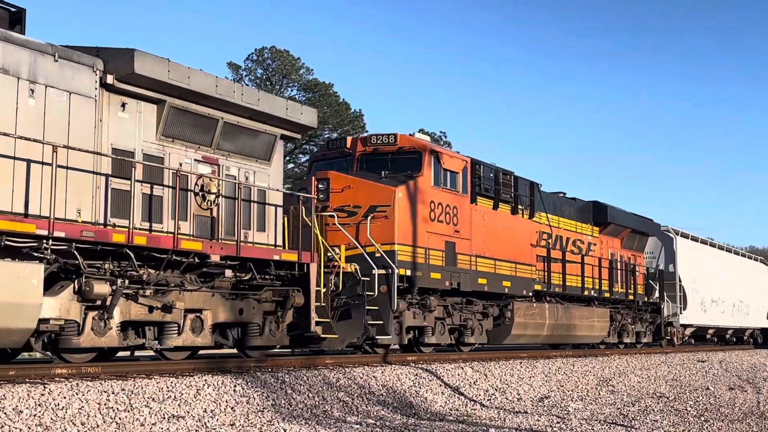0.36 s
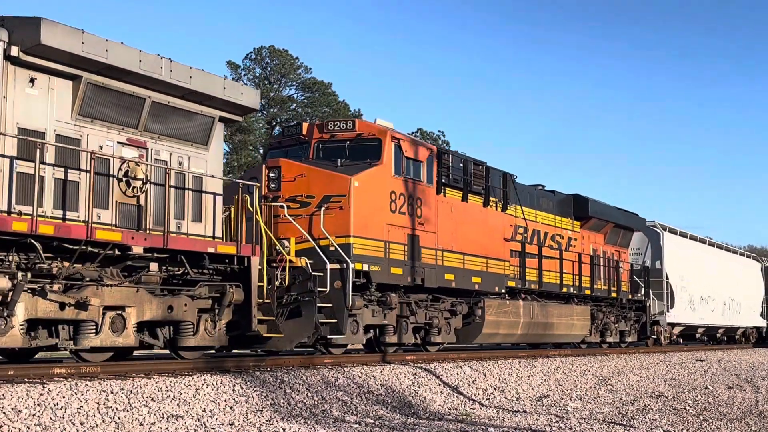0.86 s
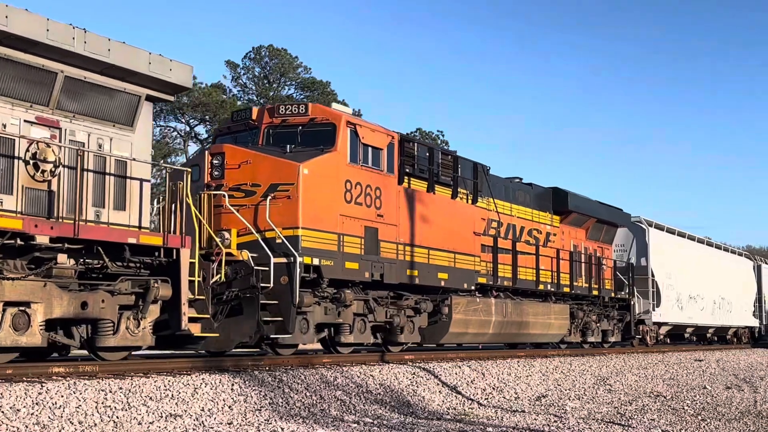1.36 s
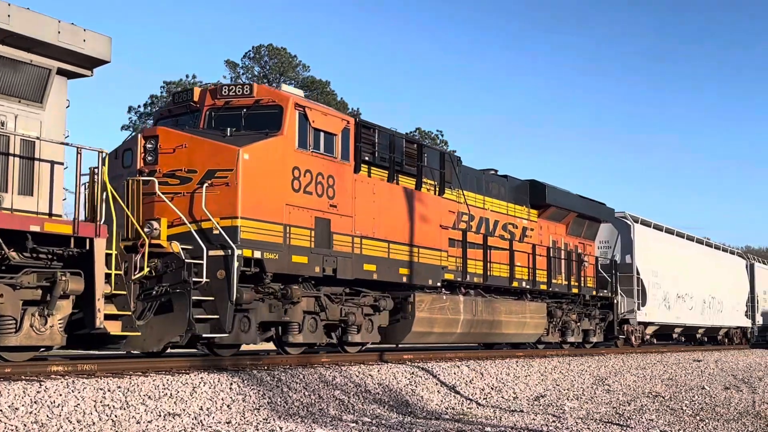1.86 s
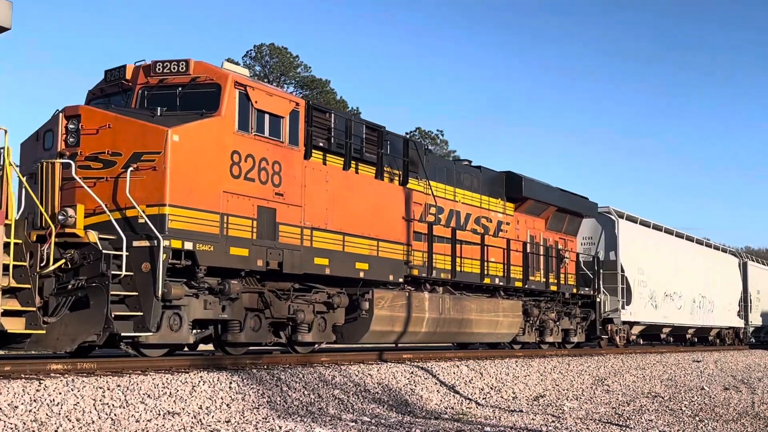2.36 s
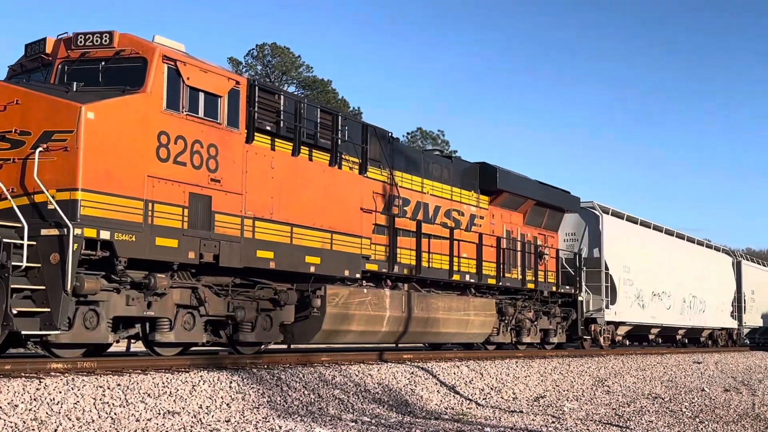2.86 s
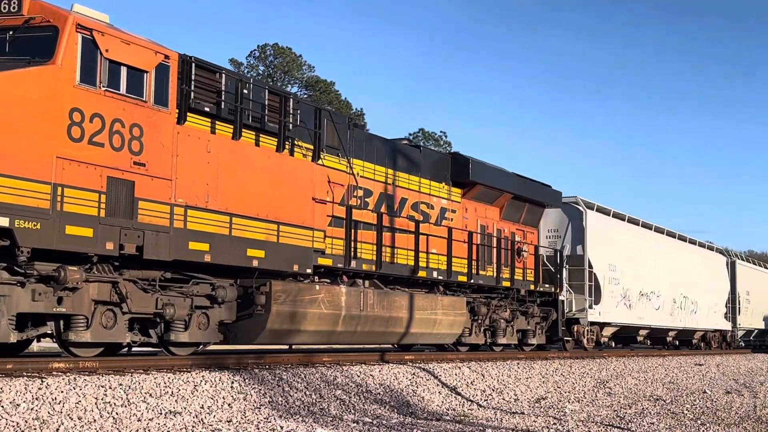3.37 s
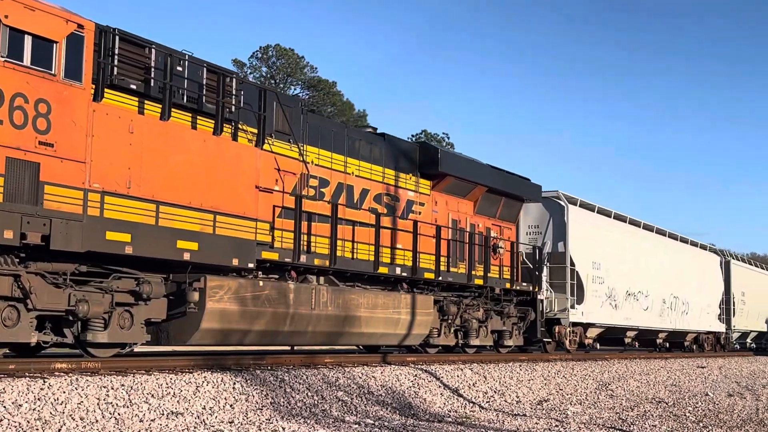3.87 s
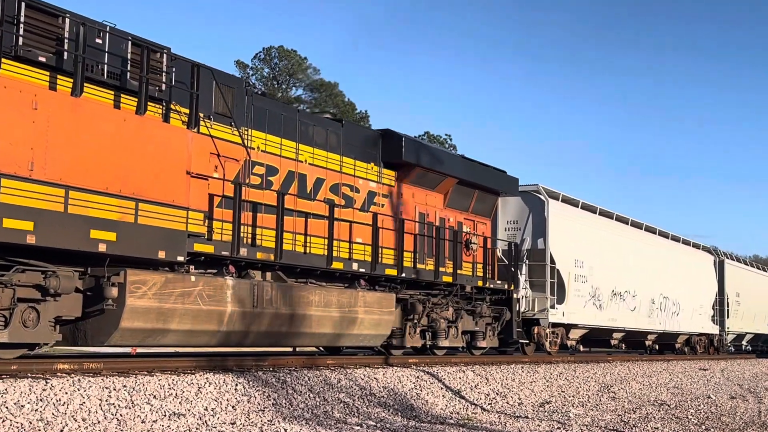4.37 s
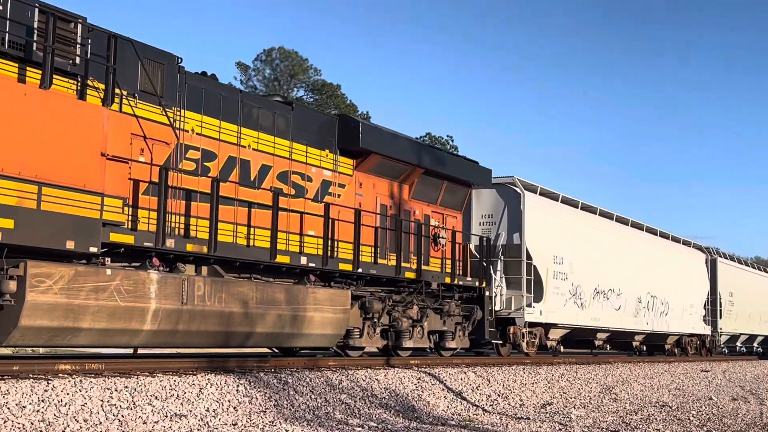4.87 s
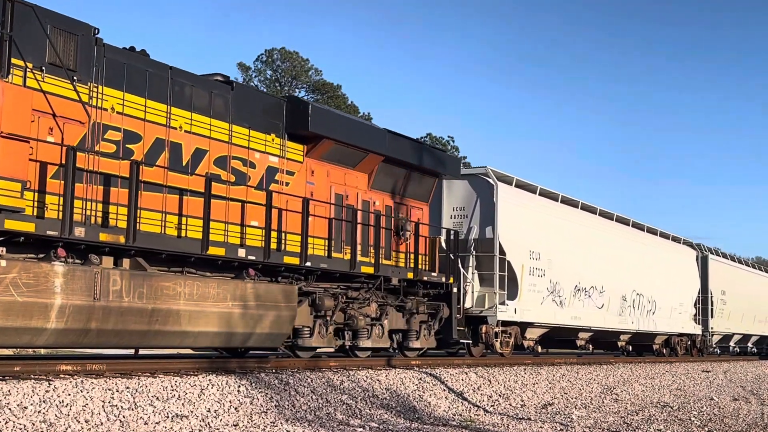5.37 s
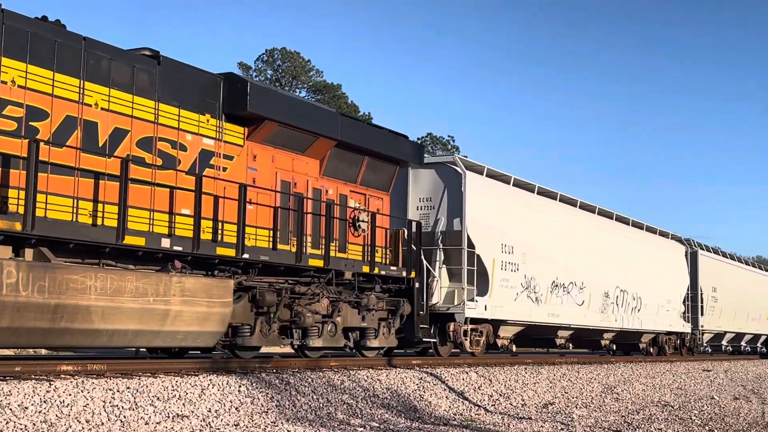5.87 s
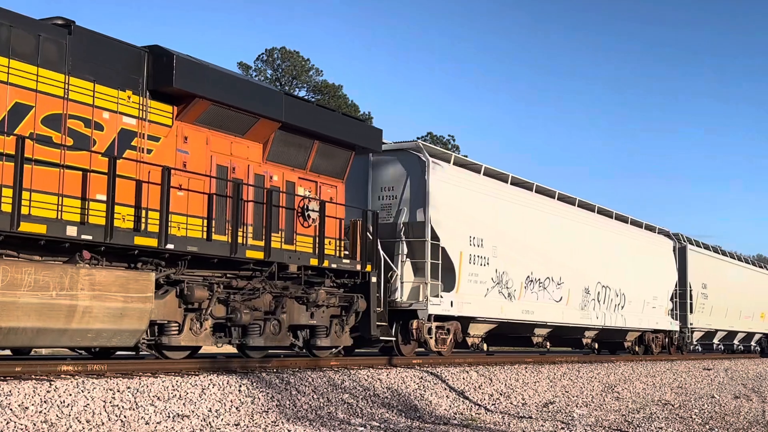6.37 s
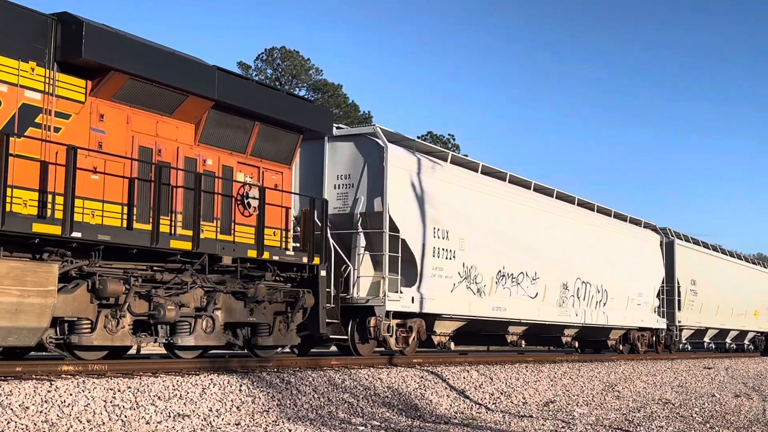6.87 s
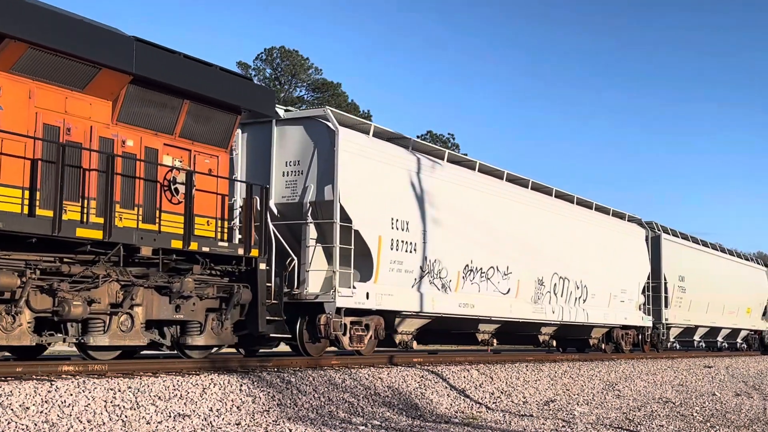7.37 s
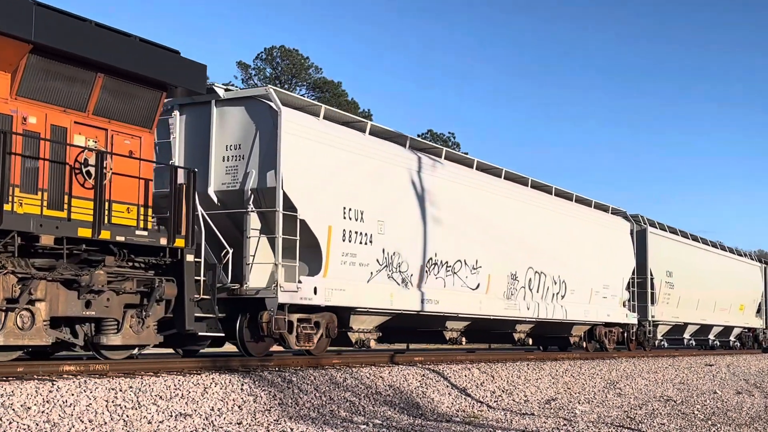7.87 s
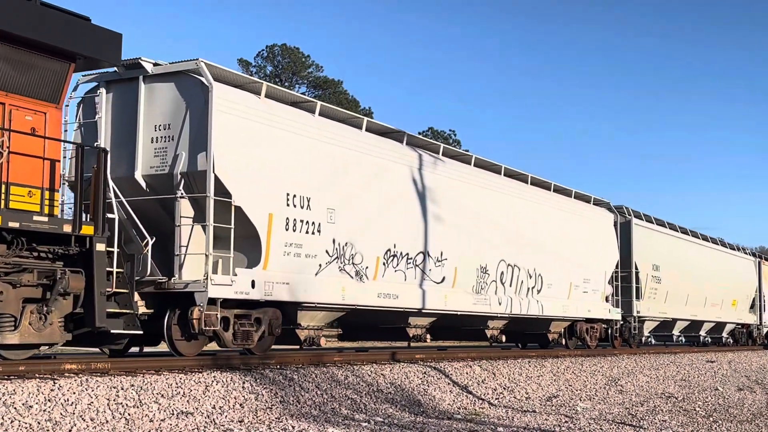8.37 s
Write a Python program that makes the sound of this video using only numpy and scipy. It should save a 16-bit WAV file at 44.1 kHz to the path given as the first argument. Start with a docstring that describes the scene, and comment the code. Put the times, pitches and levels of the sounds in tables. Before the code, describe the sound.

Deep throbbing engine hum and rumble roll by outdoors, roar growing, with metallic ticking, low wind thumps, a faint repeating bell and late wheel ringing.

```python
"""Two diesel locomotives haul a freight slowly past: their exhausts, summed orders of each engine cycle,
beat against each other. Shaped noise makes the body rumble, the roar and the wind that buffets two microphone
ports for a few seconds; resonances ring as valve gear ticks, hood panels and wheels. Sines make the
alternator whine, a fan hum, small squeaks and a bell far off."""
import sys
import numpy as np
from scipy import signal
from scipy.fft import rfft, irfft, next_fast_len
from scipy.io import wavfile
from scipy.ndimage import uniform_filter1d

SR = 44100
rng = np.random.default_rng(int(sys.argv[2]) if len(sys.argv) > 2 else 0)


def generate_wav(sig):
    """Save sig (samples, or channels by samples) to the path in sys.argv[1] as 16-bit PCM at SR."""
    pcm = np.round(np.clip(np.atleast_2d(sig).T, -1, 1) * 32767).astype(np.int16)
    wavfile.write(sys.argv[1], SR, pcm)


def invert_db(level):
    """Linear amplitude ratio for a level in decibels (20 dB per decade), elementwise."""
    return 10 ** (np.asarray(level, dtype=float) / 20)


N = 385434
T = np.arange(N) / SR  # time (s)

# roar rising as the trailing engine draws near, before each layer's trim: time_s, level_db
ROAR_CURVE = [(0, -49.5), (1, -51), (1.4, -48.5), (2.6, -48), (3.2, -48), (3.7, -46.5), (4.1, -48),
              (4.8, -47.5), (5.1, -46), (5.9, -45.5), (6.7, -43.5), (7.05, -42.5), (7.55, -42), (7.85, -40),
              (8.22, -41.5), (8.74, -42.5)]
# likeness of the two channels of rumble and roar: frequency_hz, likeness (0-1)
CHANNEL_LIKENESS = [(60, 1), (140, 0.92), (300, 0.93), (700, 0.53), (1200, 0.095), (2000, 0.74),
                    (3000, 0.94), (4500, 1), (6000, 0.82), (8500, 0.99), (12000, 0.37)]
# mean strength of the breeze: time_s, level_db
BREEZE_CURVE = [(.72, -47.5), (.9, -33), (1.1, -30), (1.6, -32.5), (2.3, -30.5), (2.7, -38.5), (3.1, -31.5),
                (3.55, -28.5), (3.9, -32.5), (4.5, -31.5), (5, -40), (5.52, -44)]


def evened(x):
    """Scales to rms 1."""
    return x / np.sqrt(np.mean(x ** 2) + 1e-20)


def read(points, hz):
    """Reads a spectrum table on a log-frequency axis."""
    f, value = np.transpose(points)
    return np.interp(np.log(hz + 1), np.log(f + 1), value)


def columns(rows, t=T):
    """Every value column of a curve table at the times t."""
    s, *values = np.transpose(rows)
    return [np.interp(t, s, v) for v in values]


def wander(rate_hz):
    """Slow random curve of rms 1, with straight lines between its points."""
    points_s = np.arange(0, T[-1] + 1, 1 / rate_hz)
    return evened(np.interp(T, points_s, rng.standard_normal(len(points_s))))


def bump(t, at_s, spread_s):
    """A bell-shaped swell of height 1."""
    return np.exp(-((t - at_s) / spread_s) ** 2)


def noise(shape_db, same, patchy_db, size):
    """Two partly alike channels of random short-time spectra; shape_db(hz, t) with drifting patches."""
    hop = size // 4
    frames, hz = N // hop + 5, np.fft.rfftfreq(size, 1 / SR)
    a, b, c, d, patches = rng.standard_normal((frames, len(hz), 5)).T
    # smoothed over frequency, then over time
    patches = uniform_filter1d(patches, size=size // 64, axis=0)
    patches = evened(uniform_filter1d(patches, size=8, axis=1))
    same = np.clip(same(hz), 0, 1)[:, None]
    first, other = a + 1j * b, c + 1j * d
    spectra = np.array([first, same * first + np.sqrt(1 - same ** 2) * other])
    spectra *= invert_db(shape_db(hz, np.arange(frames) * hop / SR) + patchy_db * patches)
    return evened(signal.istft(spectra, nperseg=size, noverlap=size - hop)[1][:, :N])


def ringing(modes, flicker_db, flicker_hz):
    """Noise kept alive in narrow modes, each flickering by itself."""
    out = np.zeros(N)
    for hz, width_hz, level_db in modes:
        edges_hz = [hz - width_hz / 2, hz + width_hz / 2]
        band = signal.butter(2, edges_hz, "bandpass", fs=SR, output="sos")
        mode = evened(signal.sosfilt(band, rng.standard_normal(N)))
        out += invert_db(level_db + flicker_db * wander(flicker_hz)) * mode
    return evened(out)


def turns():
    """Engine cycles turned by the leading and the trailing engine: the running sum of their speeds."""
    # engine speeds: time_s, leading_cycles_per_s, trailing_cycles_per_s
    speeds = [(0, 7.3532, 7.4587), (3, 7.3358, 7.4677), (6, 7.3344, 7.4492), (8.74, 7.3111, 7.4255)]
    # where in its cycle each engine starts: leading_turns, trailing_turns
    start_turns = (-.016, .2753)
    return [start + np.cumsum(speed) / SR for start, speed in zip(start_turns, columns(speeds))]


def exhausts():
    """Each stack hums the orders of its cycle; the trailing stack's outer ones emerge from behind the cab."""
    # exhaust loudness: time_s, leading_db, trailing_db
    loudness = [(0, -24.5, -33), (.6, -21, -26), (1.2, -24.5, -19.5), (1.8, -21.5, -22.5),
                (2.4, -19.5, -22), (3, -22.5, -18.5), (3.6, -21, -17.5), (4.2, -26.5, -16),
                (4.8, -21, -15.5), (5.4, -25, -14), (6, -30, -15), (6.6, -24, -13.5), (7.2, -22.5, -14),
                (7.8, -47, -12.5), (8.3, -29, -13.5), (8.74, -39, -14)]
    # twelve cylinders in uneven banks, relative levels: order (multiple of the cycle), leading_db, trailing_db
    orders = [(6, -30, -20), (7, -28, -26), (9, -13, -13), (10, -13, -17), (11, -8, -13), (12, 0, 0),
              (13, -15, -16), (14, -16, -21), (15, -4, -9), (16, -22, -25), (20, -28, -26), (21, -23, -25),
              (22, -24, -26), (24, -30, -27), (26, -30, -22), (27, -30, -20), (28, -28, -17),
              (29, -30, -21), (30, -32, -26), (31, -32, -27), (32, -32, -24), (34, -34, -29),
              (36, -34, -36)]
    hidden_db, clear_db, emerge_s, emerge_spread_s = -9, 1.0, 4.5, 1.2
    lead, trail = turns()
    lead_db, trail_db = columns(loudness)
    emerged = (1 + np.tanh((T - emerge_s) / emerge_spread_s)) / 2
    outer_db = hidden_db + (clear_db - hidden_db) * emerged
    out = np.zeros(N)
    for k, a_db, b_db in orders:
        # the manifold spreads the orders over the cycle, so only every third lines up
        lag_turns = (k - 12) * (k - 15) / 9
        is_outer = k > 17 or k < 10
        lead_level = invert_db(lead_db + a_db + .8 * wander(3))
        trail_level = invert_db(trail_db + b_db + is_outer * outer_db + .8 * wander(3))
        out -= lead_level * np.sin(2 * np.pi * (k * lead - lag_turns))
        out -= trail_level * np.sin(2 * np.pi * (k * trail - lag_turns))
    return np.sqrt(2) * out


def rumble():
    """Body rumble: low noise that takes a share of the roar's rise."""
    # relative spectrum: frequency_hz, level_db
    rumble_shape = [(25, -41), (40, -19), (65, 3), (90, -1.5), (115, 1.5), (140, -6), (200, -7.5),
                    (300, -12), (450, -19.5), (900, -47.5), (3000, -91.5)]
    level_db, share, roar_mid_db = -25, .4, -47
    rumble_db = level_db + share * (columns(ROAR_CURVE)[0] - roar_mid_db)
    body = noise(lambda hz, t: read(rumble_shape, hz)[:, None],
                 lambda hz: read(CHANNEL_LIKENESS, hz), patchy_db=0.5, size=2048)
    return invert_db(rumble_db) * body


def roar():
    """Fan and wheel noise, coloured by how far the radiator intake faces us, puffing thrice a trailing cycle."""
    # relative spectrum away from the intake: frequency_hz, level_db
    far_shape = [(150, -12.5), (260, 6), (360, 8), (470, 4.5), (700, 0.5), (1000, -3), (1250, -3),
                 (1500, -7), (2200, -9), (3100, -7), (5000, -11.5), (6500, -15.5), (7800, -20),
                 (9500, -23.5), (11500, -28), (14300, -44)]
    # relative spectrum close to the intake: frequency_hz, level_db
    near_shape = [(150, -16.5), (260, 6), (360, 13.5), (470, 10), (600, 7), (780, 1), (1050, 8.5),
                  (1270, 0), (1500, 4.5), (2200, -3.5), (3100, -8.5), (5000, -7.5), (6500, -9.5),
                  (7800, -15.5), (9500, -21), (11500, -25), (14300, -35)]
    base_share, added_share, facing_s, facing_spread_s = .27, .47, 5.6, 2.1

    def blend(hz, t):
        """Moves from the far spectrum towards the near one, in dB."""
        facing = base_share + added_share * bump(t, facing_s, facing_spread_s)
        far_db, near_db = read(far_shape, hz)[:, None], read(near_shape, hz)[:, None]
        return far_db + (near_db - far_db) * facing

    hiss = noise(blend, lambda hz: read(CHANNEL_LIKENESS, hz), patchy_db=1.68, size=512)
    puffs = 1 + 0.086 * np.cos(2 * np.pi * (3 * turns()[1] - .25))
    return invert_db(columns(ROAR_CURVE)[0] + 8.5) * puffs * hiss


def valve_gear():
    """Short scrapes at fixed places of the leading cycle ring the casing, unevenly from blow to blow."""
    # knocks in one cycle, relative levels: place_turns (0-1), level_db
    knocks = [(.06, -3), (.26, -4.5), (.39, 0.5), (.75, -11.5)]
    # casing modes, relative levels: pitch_hz, level_db, t60_s
    casing = [(1110, -2.5, 0.025), (2090, 1, 0.0097), (2820, -2, 0.004), (3370, -0.5, 0.0043),
              (4050, 0.5, 0.0034), (5040, -3.5, 0.0088), (5780, -5, 0.0051), (7350, -6, 0.0043),
              (10700, -13, 0.0023), (12400, -25, .003)]
    turn, t, out = turns()[0], np.arange(2000) / SR, np.zeros(N)
    cycle = np.floor(turn).astype(int) + 1
    for hz, level_db, t60_s in casing:
        drive = np.zeros(N)
        for place, knock_db in knocks:
            strength_db = knock_db + 4.77 * rng.standard_normal(cycle[-1] + 1)
            window = np.exp(-.5 * ((turn % 1 - place) / 0.035) ** 2)
            drive += invert_db(strength_db[cycle]) * window
        scrape = drive * rng.standard_normal(N)
        ring = invert_db(-60 * t / t60_s) * np.sin(2 * np.pi * hz * t)
        out += invert_db(level_db - 6.0) * signal.oaconvolve(scrape, ring / np.linalg.norm(ring))[:N]
    return invert_db(columns(ROAR_CURVE)[0]) * out


def housing():
    """Hood panels pick their own notes out of the roar: narrow noise bands that follow its level."""
    # panel modes, relative levels: pitch_hz, width_hz, level_db
    panels = [(1064, 50, -1), (2055, 92, 0.5), (2502, 39, -8), (2813, 200, -3), (3197, 130, -4.5),
              (3586, 110, -6.5), (4100, 70, -11.5), (4866, 97, -8.5)]
    return invert_db(columns(ROAR_CURVE)[0] - 6.5) * ringing(panels, flicker_db=4.0, flicker_hz=7)


def whine():
    """Alternator slot tone and its multiples, each wavering in level."""
    # loudness: time_s, third_multiple_db, other_multiples_db
    whine_levels = [(0, -58, -62.5), (1.7, -51.5, -63), (2.2, -65, -64.5), (4, -58, -56), (5.6, -54, -54.5),
                    (6.2, -53.5, -50.5), (7.5, -47.5, -47.5), (8.74, -53, -51)]
    # pitch of the slot tone: time_s, pitch_hz
    whine_pitch = [(0, 355.8), (4, 355.5), (6.3, 355.05), (8.74, 354.5)]
    # balance of the multiples: multiple, level_db
    multiples = [(1, 9.5), (2, 1), (3, 2.5), (4, 7), (5, -1), (6, -12.5), (7, -13.5)]
    third_db, other_db = columns(whine_levels)
    phase = 2 * np.pi * np.cumsum(columns(whine_pitch)[0]) / SR
    out = np.zeros(N)
    for k, k_db in multiples:
        level_db = (third_db if k == 3 else other_db) + k_db + 2.6 * wander(8)
        out += invert_db(level_db) * np.sin(k * phase + 2 * np.pi * rng.random())
    return out


def bell():
    """Each stroke restarts the gong, a decaying sine; distance softens the onset."""
    # strength of each stroke as the air and the passing cars carry it: level_db
    stroke_db = [-50, -43, -41, -43, -42.5, -39, -40, -41.5, -41.5, -40, -41, -42, -39, -34.5, -39.5, -36.5,
                 -38, -37.5, -33.5, -36.5, -35, -40.5, -33, -48, -47, -39]
    first_s, every_s, pitch_hz, t60_s = -.235, .347, 1497.6, 1.6
    stroke, since = np.divmod(T - first_s, every_s)
    stroke = stroke.astype(int)
    phase_turns = rng.random(len(stroke_db))[stroke]
    onset = 1 - np.exp(-since / 0.002)
    release = np.clip((every_s - since) / .06, 0, 1)  # fades out just ahead of the next stroke
    shape = onset * release * invert_db(-60 * since / t60_s)
    return invert_db(np.take(stroke_db, stroke)) * shape * np.sin(2 * np.pi * (pitch_hz * T + phase_turns))


def gust_db(t):
    """The breeze with its gusts, added as powers."""
    # gusts on top of the breeze: centre_s, level_db, spread_s
    gusts = [(1.696, -26.5, .05), (1.936, -27, 0.067), (2.163, -26.5, 0.036), (2.482, -26.5, .11),
             (2.8, -31, 0.043), (3.068, -27.5, .08), (3.294, -27.5, 0.067), (3.637, -28.5, 0.078),
             (4.004, -29, .04), (4.304, -29.5, 0.077), (4.73, -28.5, 0.042), (5.117, -35, .04),
             (5.36, -29.5, 0.038)]
    power = invert_db(2 * columns(BREEZE_CURVE, t)[0])
    power = power + sum(invert_db(2 * level_db) * bump(t, s, spread_s) for s, level_db, spread_s in gusts)
    return 10 * np.log10(power)


def wind():
    """Wind buffets the ports in lumps, brighter in strong gusts, with low thumps and a late knock of the train."""
    # relative spectrum at a middling gust: frequency_hz, level_db
    wind_shape = [(25, -34), (45, -7.5), (70, 2), (120, 4.5), (250, -2.5), (400, -3), (600, -9.5),
                  (900, -18), (1300, -27), (2200, -37), (5000, -82.5)]
    # sudden low thumps in the wind, each a cycle or two, and one late knock from the train (the last row):
    # start_s, level_db (before the trims below), pitch_hz (settled)
    thumps = [(0.888, -24.5, 320), (1.445, -20, 339), (1.703, -18.5, 581), (1.878, -20, 301),
              (2.114, -20, 345), (2.161, -17, 320), (2.236, -24.5, 390), (2.328, -22, 304),
              (2.399, -14, 352), (2.494, -16, 362), (2.514, -13, 396), (2.64, -21, 318), (2.95, -25.5, 310),
              (3.22, -18.5, 366), (3.34, -18, 398), (3.481, -19.5, 328), (3.562, -15.5, 351),
              (3.591, -22, 556), (3.698, -12.5, 328), (3.882, -19.5, 388), (3.998, -19.5, 301),
              (4.045, -18.5, 334), (4.192, -22.5, 361), (4.751, -22.5, 549), (5.366, -11.5, 368),
              (7.149, -18.5, 358)]
    pop_s, sag_s, sag_turns = .0022, 0.0013, 0.28  # each swells, then dies; its pitch starts high and sags

    def reach(hz, t):
        """Tilts the spectrum brighter as the gust strengthens."""
        tilt = 0.14 * np.log2(hz / 300 + .5)[:, None]
        return read(wind_shape, hz)[:, None] + tilt * (gust_db(t) + 30.5)

    lumps = noise(reach, lambda hz: .85 + 0 * hz, patchy_db=0.0, size=1024)  # likeness .85 throughout
    fade_in = np.clip((T - BREEZE_CURVE[0][0]) / 0.076, 0, 1)
    fade_out = np.clip((BREEZE_CURVE[-1][0] - T) / 0.28, 0, 1)
    size = invert_db(gust_db(T) + 3.3 * wander(80)) * fade_in * fade_out
    pops = np.zeros(N)
    for s, level_db, hz in thumps:
        since = np.maximum(T - s, 0)
        size += invert_db(level_db - 7.5) * (1 - np.exp(-since / 0.0011)) * np.exp(-since / 0.0089)
        swell = since / pop_s * np.exp(1 - since / pop_s)
        cycles = hz * since + sag_turns * np.tanh(since / sag_s)
        pops += invert_db(level_db - 3.0) * swell * np.sin(2 * np.pi * cycles)
    return size * lumps + pops


def squeaks():
    """Running gear, metal slipping on metal: short tones that slide up a little."""
    # squeaks: centre_s, level_db, pitch_hz
    slips = [(1.32, -47, 4880), (1.83, -50, 3500), (2.515, -43, 1780), (7.28, -43, 3620), (7.28, -42, 1800),
             (7.55, -41, 3600), (7.69, -43, 4000), (8.21, -40, 3970)]
    spread_s, glide_per_s = 0.018, 0.67
    out = np.zeros(N)
    for s, level_db, hz in slips:
        since = T - s
        tone = np.sin(2 * np.pi * hz * since * (1 + glide_per_s * since / 2))
        out += invert_db(level_db) * bump(T, s, spread_s) * tone
    return out


def fan():
    """Cooling fan: a low hum with two strong multiples, wavering, fading in as the radiator end draws near."""
    # hum partials: multiple, level_db
    partials = [(1, -35.5), (3, -33.5), (4, -39)]
    shaft_hz, near_s, near_spread_s = 66.1, 4.86, .8
    near = (1 + np.tanh((T - near_s) / near_spread_s)) / 2
    phase = 2 * np.pi * shaft_hz * np.cumsum(1 + .002 * wander(1.996)) / SR
    hum = np.zeros(N)
    for k, level_db in partials:
        hum += invert_db(level_db + 2.0 * wander(4)) * np.sqrt(2) * np.sin(k * phase)
    return near * hum


def wheels():
    """Rolling roughness keeps the wheel plates of the last axles ringing in uneven bursts."""
    # rolling ring: time_s, level_db
    rolling = [(5.5, -48), (6, -42.5), (6.4, -49.5), (6.8, -47.5), (7.35, -42.5), (7.8, -34), (8.15, -33),
               (8.74, -39)]
    # brief swells of the ringing near 1.5 kHz and just above: centre_s, level_db
    swells = [(7.55, -35), (7.82, -38.5)]
    # wheel plate modes, relative levels: pitch_hz, width_hz, level_db
    plates = [(1437, 84, 6.5), (1510, 54, 0.5), (1660, 270, -9.5), (1770, 120, -5), (1850, 220, -3.5)]
    swell_spread_s = 0.027
    size = invert_db(columns(rolling)[0])
    size = size + sum(invert_db(level_db) * bump(T, s, swell_spread_s) for s, level_db in swells)
    fade_in = np.clip(T - rolling[0][0], 0, 1)  # over one second
    return size * fade_in * ringing(plates, flicker_db=2.0, flicker_hz=12)


def scene():
    """Train, bell and wind."""
    engines = exhausts() + rumble() + roar() + valve_gear() + housing() + whine()
    return engines + bell() + wind() + squeaks() + fan() + wheels()


def band_limit(x):
    """A steep low-pass at the top of the band."""
    return signal.sosfilt(signal.butter(12, 14350, fs=SR, output="sos"), x)


def record(dry):
    """The two microphone ports differ in level and phase by frequency."""
    # left over right: frequency_hz, level_db
    port_level = [(60, 0), (400, 0), (490, -.5), (740, .5), (1120, -1.5), (1450, -7), (1700, -9),
                  (2000, -5), (2580, -1.5), (3500, 0), (14000, 0)]
    # how far left leads right: frequency_hz, phase_rad
    port_lead = [(0, 0), (1030, .3), (1550, 3.8), (1810, 6.4), (5080, 6.2), (5900, 5.4), (7000, 4.7),
                 (7900, 3.4), (8100, 3.14), (8950, 3.14), (9600, 1.6), (11100, .1), (13500, -.3),
                 (14300, -1.5)]
    size = next_fast_len(N + 4096)
    hz = np.fft.rfftfreq(size, 1 / SR)
    left = invert_db(read(port_level, hz) / 2)
    right = np.exp(-1j * read(port_lead, hz)) / left
    ports = irfft(rfft(dry, size) * np.array([left, right]), size)[:, :N]
    return band_limit(ports)


dry = scene()
out = record(dry)
generate_wav(out)
```